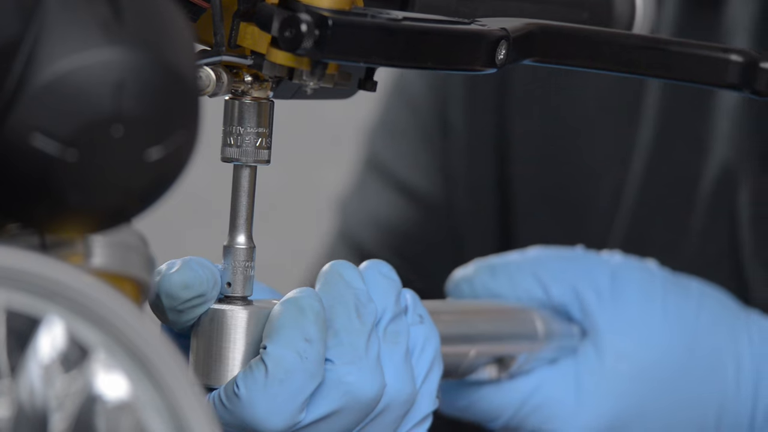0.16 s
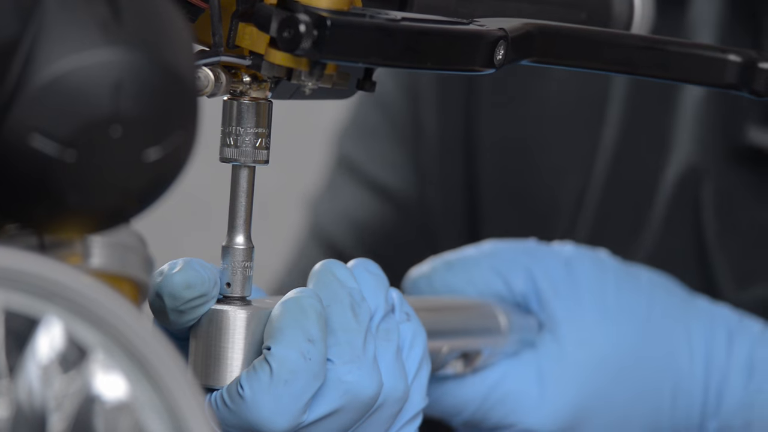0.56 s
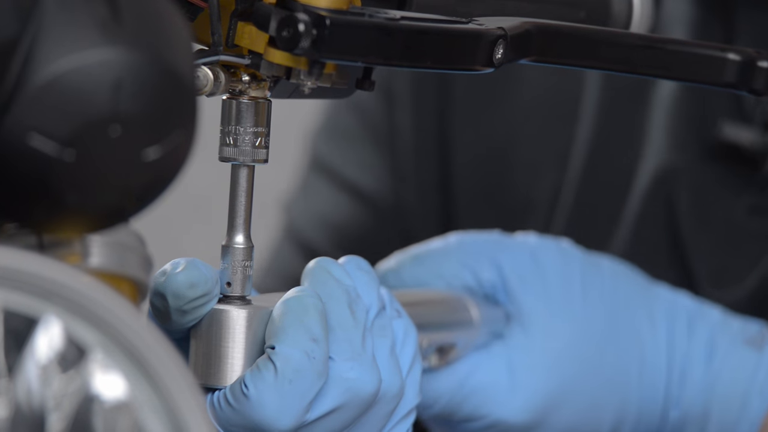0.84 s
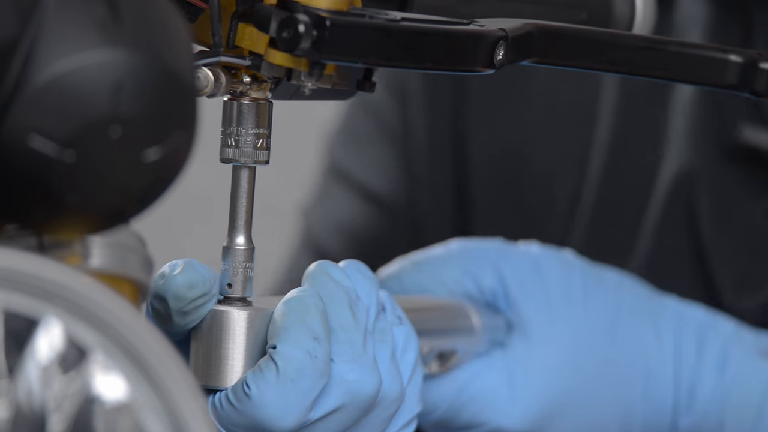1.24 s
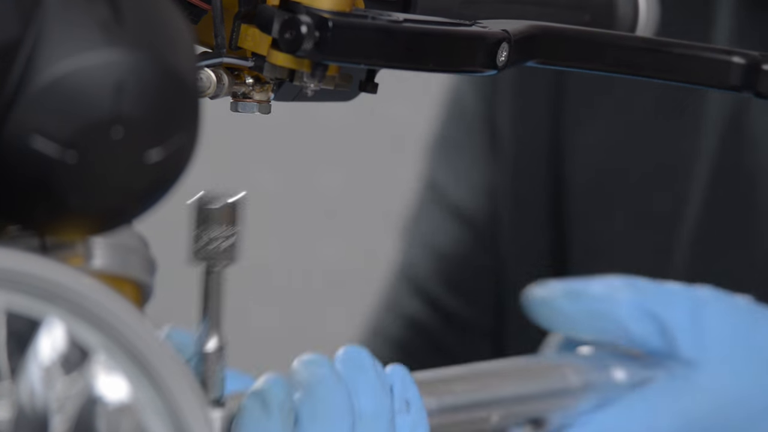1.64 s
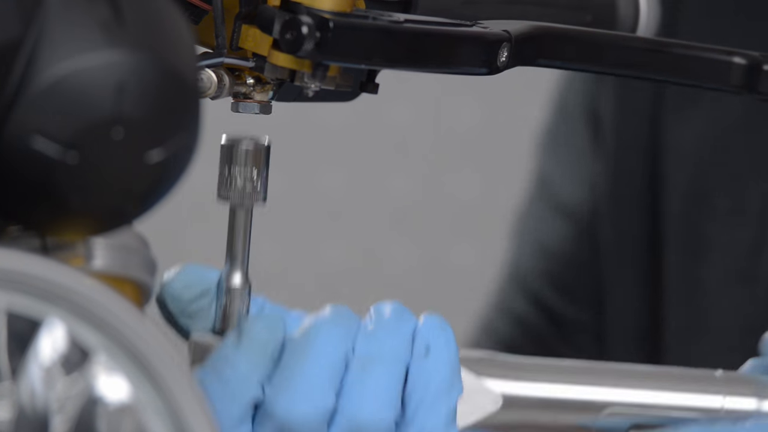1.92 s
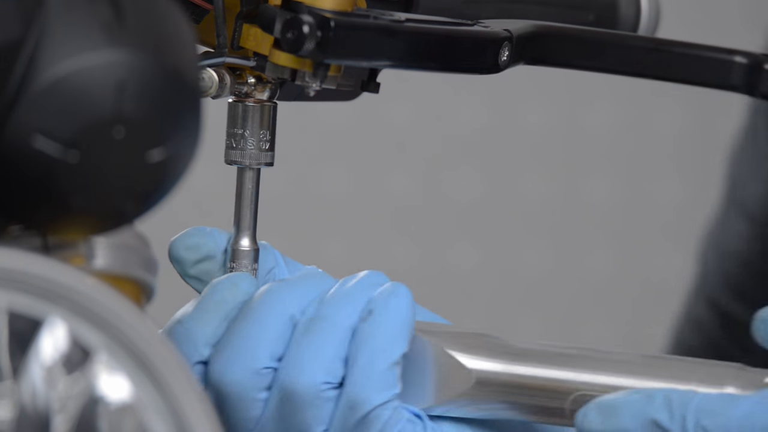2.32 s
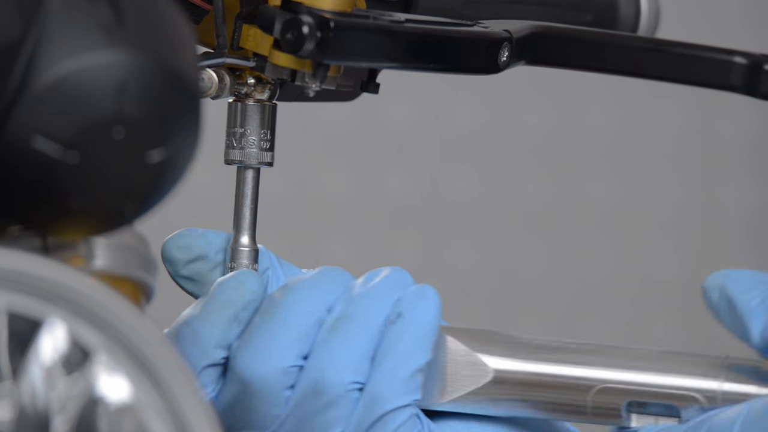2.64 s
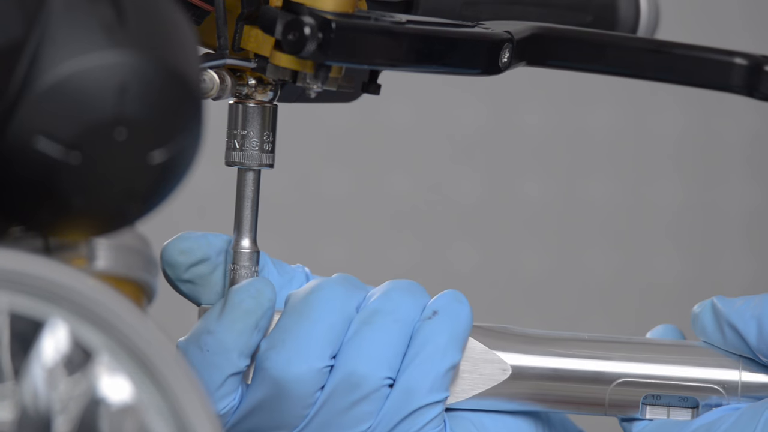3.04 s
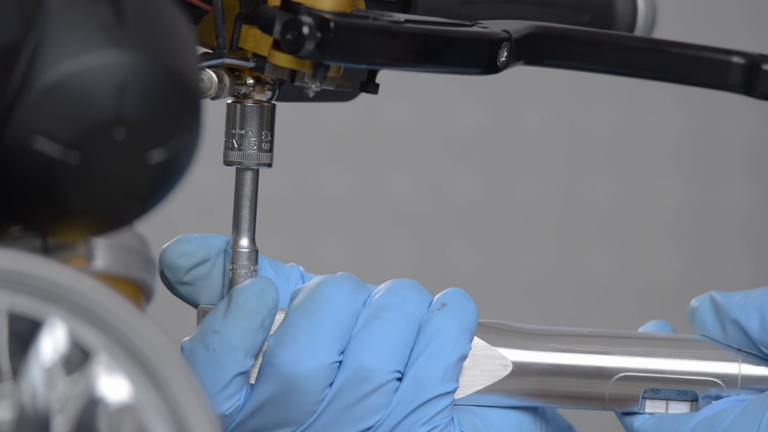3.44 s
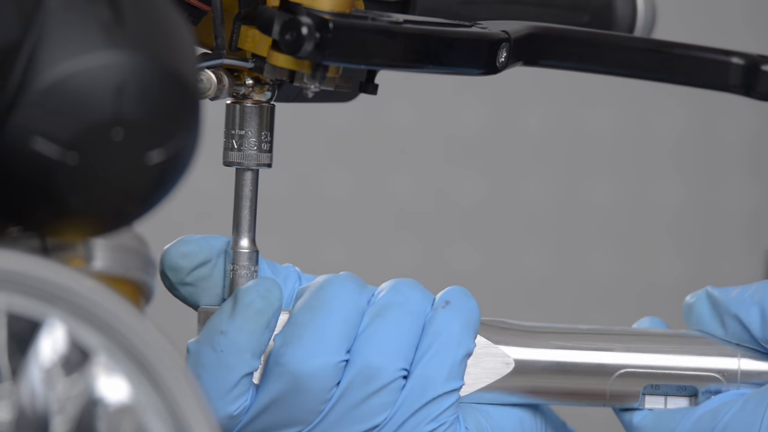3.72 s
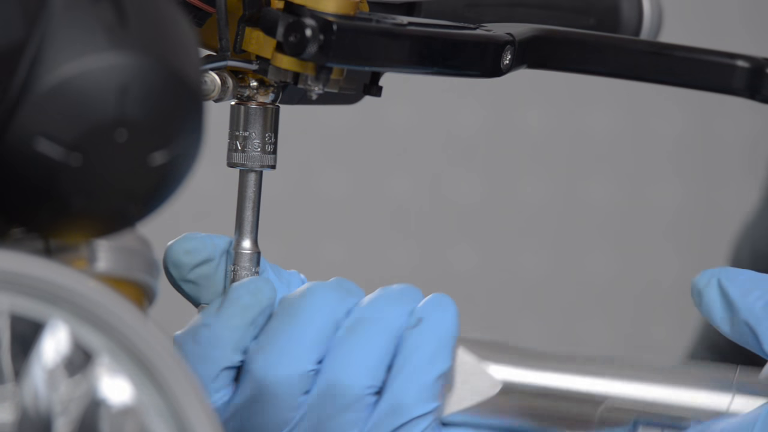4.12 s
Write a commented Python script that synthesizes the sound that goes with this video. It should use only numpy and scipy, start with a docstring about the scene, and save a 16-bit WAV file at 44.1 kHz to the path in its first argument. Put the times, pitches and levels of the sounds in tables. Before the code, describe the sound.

A quiet workshop heard close up, with very faint, dull ventilation noise throughout. From 0 to 0.67 s a ratchet gives about fourteen tiny, uneven ticks, some doubled, over barely audible glove creep. At 0.73 s the wrench breaks over: a very loud, dry, bright steel crack, its ring dying within hundredths of a second, then quick echoes, a short room tail of under half a second and a faint singing of the frame. Rubber gloves hiss softly from 1.2 to 1.95 s. A bright knock at 1.56 s starts loose-socket chatter and gritty scraping, with a low hand bump near 1.74 s. At 2.06 s a firm double steel knock clunks the bracket, followed by small dull rattles to 2.45 s. Gloves rub at 2.5-2.8 s, with a brief scrape and weak taps until 2.96 s. After near silence, a second equally loud click snaps at 3.69 s. A light bright knock, soft bump and short glove slide end it around 4.2 s.

```python
"""A click-type torque wrench tightens two bolts under a motorcycle's handlebar in a quiet workshop.
Its ratchet ticks faintly, then it breaks over with a sharp steel click: decaying modes plus noise bursts.
Gloves hiss on the handle, the loose socket chatters and scrapes on its extension (random stick-slip) and
knocks its way to the next bolt (bursts and a ringing bracket); the wrench breaks over again.
Echoes, room tail and air noise surround it."""
import sys
import numpy as np
from scipy import signal
from scipy.io import wavfile

SR = 44100
rng = np.random.default_rng(int(sys.argv[2]) if len(sys.argv) > 2 else 0)


def generate_wav(signal):
    """Clip the signal to [-1, 1] and save it as 16-bit WAV at the path in sys.argv[1]."""
    frames = np.transpose(np.atleast_2d(signal))
    scaled = np.clip(frames, -1, 1) * 32767
    pcm = np.round(scaled).astype(np.int16)
    wavfile.write(sys.argv[1], SR, pcm)


N = 188042
HZ = np.fft.rfftfreq(8192, 1 / SR)

# break-overs: (time [s], level [dB], grip [0 = hand round the head, 1 = hand round the shank])
BREAK_OVERS = [(0.7257, 0.000077, 0), (3.6862, 0.0031, 1)]


def amp(db):
    """Decibels to gain."""
    return 10 ** (np.asarray(db) / 20)


def evened(x):
    """Scales to rms 1."""
    return x / np.sqrt(np.mean(x ** 2) + 1e-20)


def decay(t, t60):
    """Exponential decay by 60 dB in t60 seconds."""
    return np.exp(-np.log(1000) * t / t60)


def read(points, hz):
    """Interpolates a spectrum along a log-frequency axis."""
    f, value = np.transpose(points)
    return np.interp(np.log(hz + 1), np.log(f + 1), value)


def add(mix, s, sound):
    """Lays a sound into the mix at time s."""
    part = mix[max(round(s * SR), 0):][:len(sound)]
    part += sound[:len(part)]


def colour(x, db):
    """Minimum-phase filter with the gain db at the frequencies HZ."""
    log_gain = np.log(amp(np.r_[db, db[-2:0:-1]]))
    taps = np.fft.ifft(np.exp(np.conj(signal.hilbert(log_gain)))).real
    return signal.oaconvolve(x, taps[:len(HZ)])[:len(x)]


def coloured_impulse(db):
    """Impulse response of the gain db at HZ."""
    return colour(signal.unit_impulse(len(HZ)), db)


def ring(modes, rise_s, length_s):
    """Dying sines, neighbours in opposite sign, swelling as the blow spreads through the metal."""
    t = np.arange(int(length_s * SR)) / SR
    sines = np.zeros(len(t))
    for k, (hz, t60, db) in enumerate(modes):
        sines += (-1) ** k * amp(db - 60 * t / t60) * np.sin(2 * np.pi * hz * t)
    return sines * (1 - np.exp(-(t / rise_s) ** 2))


def burst(db, rise_s, t60):
    """A contact excites countless brief overtones: coloured, decaying noise."""
    t = np.arange(len(HZ)) / SR
    grains = rng.choice([-1., 1.], len(t)) * (1 - np.exp(-t / rise_s)) * decay(t, t60)
    sound = colour(grains, db)
    return sound / np.sort(abs(sound))[-3:].mean()  # mean of the three highest peaks = 1


def strokes(rows, rise_share=0.23, swell_db=3, stop_s=.02, waver_db=2.94, waver_s=0.041):
    """Rubbing strength: each stroke rises, swells as it gains speed and dies away; pressure wavers."""
    t, strength = np.arange(N) / SR, np.zeros(N)
    for start, length, db in rows:
        age = np.maximum(t - start, 0)
        done = np.minimum(age / length, 1)
        rise = np.sqrt(np.minimum(done / rise_share, 1))
        stop = np.exp(-np.maximum(age - length, 0) / stop_s)
        strength += amp(db + swell_db * (done - .5)) * rise * stop
    pressure = np.interp(t / waver_s, np.arange(N), rng.standard_normal(N))
    return strength * amp(waver_db * pressure)


def slips(strength, per_s, spread_db):
    """Tiny, uneven stick-slip releases at random times that follow the strength of the rubbing."""
    sizes = amp(spread_db * np.minimum(rng.exponential(1, N), 4)) * rng.standard_normal(N)
    return strength * evened(sizes * (rng.random(N) < per_s / SR))


def air(rms_db=-66.5):
    """Steady, dull ventilation noise."""
    # noise spectrum: (frequency [Hz], relative density [dB])
    air_colour = [(12, -26.5), (20, -3), (96, -16), (204, -16), (228, -12.5), (262, -8.5), (310, -10),
                  (422, -4.5), (574, -14.5), (849, -11), (1150, -18.5), (1480, -15), (2080, -19),
                  (2530, -29.5), (11500, -46.5), (16000, -57)]
    return amp(rms_db) * evened(colour(rng.standard_normal(N), read(air_colour, HZ)))


def workshop(x, near_db=-11, near_t60=0.069, near_delay_s=.002, tail_db=-14, tail_delay_s=0.0079):
    """Quick echoes off the motorcycle's parts, then the diffuse tail of the room."""
    # reverberation time: (frequency [Hz], t60 [s])
    room_t60 = [(100, .8), (400, .45), (1500, .4), (5300, .4), (7500, .31), (11000, .26), (16000, .23)]
    # reverberation colour: (frequency [Hz], level [dB])
    room_colour = [(80, 10), (250, 1.5), (600, -6.5), (1000, -1), (1600, 1.5), (3000, 1.5), (5300, 1.5),
                   (7000, -1.5), (14000, 0.5)]
    t = np.arange(SR) / SR
    near = rng.standard_normal(SR) * (rng.random(SR) < 5000 / SR)  # 5000 echoes/s
    near = near * (t > near_delay_s) * decay(t, near_t60)
    hz, age, z = signal.stft(rng.choice([-1., 1.], SR), SR, nperseg=256)
    z = z * decay(age, read(room_t60, hz)[:, None])
    tail = signal.istft(z, SR, nperseg=256)[1][:SR] * (t > tail_delay_s)
    response = amp(near_db) * near / np.linalg.norm(near) + amp(tail_db) * tail / np.linalg.norm(tail)
    return signal.fftconvolve(x, colour(response, read(room_colour, HZ)))[:N]


def surface_echoes(direct):
    """Nearby hard surfaces throw back delayed, weaker copies of the direct sound."""
    # reflections: (delay [s], level [dB])
    reflections = [(.003, -25), (.0055, -27.5), (0.0127, -23), (0.0146, -24), (.019, -26)]
    out = np.zeros(N)
    for delay, db in reflections:
        add(out, delay, amp(db) * direct)
    return out


def frame(sing_db=-62, sing_t60=1.8):
    """Frame and handlebar sing on faintly after a break-over: modes so close they form decaying noise."""
    # frame spectrum: (frequency [Hz], level [dB])
    frame_colour = [(40, 7), (100, 9), (300, -8), (900, -3), (2500, -3.5), (5600, -1.5), (6600, -10),
                    (14000, -17)]
    out, t = np.zeros(N), np.arange(SR) / SR
    for s, db, grip in BREAK_OVERS:
        modes = evened(colour(rng.standard_normal(SR), read(frame_colour, HZ)))
        add(out, s, amp(db + sing_db) * decay(t, sing_t60) * modes)
    return out


def bumps():
    """A gloved hand meets the tool: a low puff without ring."""
    # bumps: (time [s], level [dB])
    bump_rows = [(1.743, -59.5), (2.954, -68), (4.176, -59.5)]
    # bump spectrum: (frequency [Hz], level [dB])
    bump_colour = [(30, -8.5), (60, -8), (100, 4.5), (180, -18), (500, -39.5), (2000, -68)]
    out = np.zeros(N)
    for s, db in bump_rows:
        add(out, s, amp(db) * burst(read(bump_colour, HZ), rise_s=0.0041, t60=0.077))
    return out


def gloves(slide_db=5, rest_db=-83.5):
    """Rubber slides on the handle: slips so many that they merge into a hiss; resting gloves creep a little."""
    # slides: (start [s], length [s], level [dB])
    slide_rows = [(0, 0.692, -88), (.62, 0.1283, -76), (1.23, 0.7194, -71.5), (2.22, 0.1315, -81),
                  (2.5, 0.2878, -68.5), (2.85, .09, -78.5), (4.04, .03, -83.5), (4.13, .13, -67.5)]
    # rubber hiss spectrum: (frequency [Hz], level [dB])
    glove_colour = [(300, -8.5), (1050, -2.5), (1800, 5.5), (2700, -1), (3800, -0.5), (5800, -5),
                    (8500, -9), (12000, -14.5), (15500, -16)]
    strength = amp(rest_db) + strokes(slide_rows)
    return amp(slide_db) * colour(slips(strength, per_s=13000, spread_db=3.5), read(glove_colour, HZ))


def scrape():
    """The loose socket chatters and scrapes on its extension: separate gritty slips ring its steel."""
    # scrapes: (start [s], length [s], level [dB])
    scrape_rows = [(1.56, 0.08, -69.5), (1.68, 0.1846, -66), (2.68, 0.098, -72.5)]
    # socket modes: (frequency [Hz], t60 [s], level [dB])
    socket_modes = [(1697, 0.0086, -9.5), (3418, 0.004, 0.5), (4138, 0.00367, -2.5), (6100, 0.0038, -7.5),
                    (14900, 0.0044, -18)]
    body = ring(socket_modes, rise_s=.0001, length_s=.05)
    grit = slips(strokes(scrape_rows), per_s=450, spread_db=0.78)
    return signal.oaconvolve(grit, body / np.linalg.norm(body))[:N]


def socket(knock_db=-1, pivot_hz=3500, room_db=-2, clunk_db=3, clunk_per_dullness=1.475,
           clunk_lag_s=0.001237, clunk_room_db=-4):
    """Loose steel on steel: glancing knocks are bright, square ones dull and ring the bracket more.
    Returns the direct sound and what goes into the room."""
    # socket on its extension and the bolt heads: (time [s], level [dB], brightness [dB/octave])
    knock_rows = [(1.5597, -36, 5), (1.627, -53, 8), (1.669, -49.5, -1), (1.7341, -40, -1),
                  (1.7537, -42, -0.5), (1.8824, -52, 2.5), (1.9293, -46.5, 1), (2.0588, -26, -1.2),
                  (2.0617, -28.5, 2.5), (2.15, -43, 2), (2.261, -49, -1.5), (2.2888, -48, -4.5),
                  (2.3097, -43, -1.5), (2.3286, -48, -6), (2.3357, -46.5, -2.5), (2.4482, -48, -2),
                  (2.7987, -49.5, -4), (2.9633, -54, 0.0), (4.1698, -36, 2.5), (4.1871, -49, -7.5)]
    # knock spectrum: (frequency [Hz], level [dB])
    knock_colour = [(150, -11.5), (450, -7), (1100, 1), (1800, 4.5), (2800, -1.5), (3700, -0.5),
                    (5200, 1.5), (7500, -6.5), (11000, -13), (15500, -25.5)]
    # bracket that holds the bolts, modes: (frequency [Hz], t60 [s], level [dB])
    bracket_modes = [(340, .04, -27), (466.2, 0.093, -20.5), (677.4, 0.082, -27.5), (1003, 0.0211, -20.5),
                     (1489, 0.059, -26), (1858, .014, -5)]
    # span in which knocks reach the bracket: (start [s], end [s])
    seating = (2.0, 2.5)
    direct, spread = np.zeros(N), np.zeros(N)
    octaves = np.log2(np.maximum(HZ, 1000) / pivot_hz)
    bracket = ring(bracket_modes, rise_s=.0003, length_s=.5)
    for s, db, brightness in knock_rows:
        tone = read(knock_colour, HZ) + brightness * octaves
        knock = amp(db + knock_db) * burst(tone, rise_s=.0003, t60=.012)
        add(direct, s, knock)
        add(spread, s, amp(room_db) * np.std(knock) * evened(coloured_impulse(tone)))
        if seating[0] < s < seating[1]:
            clunk = amp(db + clunk_db - clunk_per_dullness * brightness) * bracket
            add(direct, s + clunk_lag_s, clunk)
            add(spread, s + clunk_lag_s, amp(clunk_room_db) * clunk)
    return direct, spread


def ratchet(tick_db=-2.4, settle_db=-1.5):
    """The small pawl drops over the teeth and often ticks again as it settles."""
    # ticks: (time [s], level [dB], delay of second tick [s], 0 = none)
    tick_rows = [(.0054, -47.5, 0.0097), (0.0267, -53, 0.0063), (0.0754, -49.5, 0.0029),
                 (.1096, -49.5, 0.0052), (.155, -52, 0.0016), (0.182, -50.5, 0), (.2355, -51, 0),
                 (0.3075, -51.5, 0.0135), (0.3543, -50.5, 0.0154), (0.4322, -48.5, .004),
                 (0.4776, -51.5, 0.00011), (0.5993, -50.5, 0), (0.624, -48.5, 0.00028),
                 (0.6725, -52, 0.0018)]
    # tick spectrum: (frequency [Hz], level [dB])
    tick_colour = [(500, -23.5), (1300, -2.5), (1900, 6.5), (2700, -7.5), (3800, -1), (6000, -5),
                   (8000, -12.5), (11000, -15), (13000, -26), (15500, -38)]
    out, tone = np.zeros(N), read(tick_colour, HZ)
    for s, db, settle_s in tick_rows:
        add(out, s, amp(db + tick_db) * burst(tone, rise_s=0.00038, t60=0.0084))
        if settle_s > 0:
            second = amp(db + settle_db + tick_db) * burst(tone, rise_s=0.00038, t60=0.0084)
            add(out, s + settle_s, second)
    return out


def break_overs(crack_db=-11, slip_db=-16, slip_lead_s=0.00065, room_db=17):
    """The pawl block slips off its seat, then the head slaps the tube and the whole tool rings.
    Returns the direct sound and what the tool sends into the room."""
    # wrench, socket and the frame they bear on, modes:
    # (frequency [Hz], t60 [s], level in grip 0 [dB], level in grip 1 [dB])
    wrench_modes = [(32, 0.12, -47, -39.5), (79.12, 0.11, -54, -41), (132.45, .25, -60, -61.5),
                    (201, 1.8, -66, -69.5), (307.2, 0.016, -28.5, -20.5), (456, 0.041, -23, -22),
                    (1080, 0.01, -15, -15), (1300, 0.016, -22.5, -22), (1541.3, 0.026, -24.5, -15),
                    (1780, .014, -16.5, -23), (1947, 0.025, -15.5, -16), (2504.4, 0.011, -23.5, -18),
                    (3174, 0.01, -17.5, -9.5), (3674.4, 0.008, -9, -5), (4445, 0.0073, -0.5, -6),
                    (5359.8, 0.01, -12, -5), (5730, 0.77, -65.5, -76), (6592, .011, -16.5, -8),
                    (7273, 2.5, -79, -103.5), (7828.5, 0.01, -5, -11.5), (9170, 0.008, -23, -28.5),
                    (10234, 0.012, -13, -15.5), (12155, 0.0083, -28, -27.5), (13433, 0.024, -24, -24)]
    # dense, short-lived steel overtones: (frequency [Hz], level [dB])
    crack_colour = [(200, -17.5), (900, -1.5), (2000, -1.5), (4500, -3), (7000, -4.5), (11000, -8.5),
                    (14000, -11.5), (16000, -22)]
    # shading of the room sound by the hands: (frequency [Hz], gain in grip 0 [dB], gain in grip 1 [dB])
    hand_shading = [(200, 3.5, 0), (700, -3, -0.5), (1148, 0.5, -1.5), (1551, 0, 3), (2274, -3.5, -3.5),
                    (2913, 2.5, 2), (3900, -4.5, -2), (5350, 3, 4), (6600, -0.5, 0)]
    direct, spread, steel = np.zeros(N), np.zeros(N), read(crack_colour, HZ)
    for s, db, grip in BREAK_OVERS:
        modes = [(hz, t60, levels[round(grip)]) for hz, t60, *levels in wrench_modes]
        add(direct, s - slip_lead_s, amp(db + slip_db) * burst(steel, rise_s=.0008, t60=.005))
        add(direct, s, amp(db) * ring(modes, rise_s=0.00025, length_s=0.99))
        add(direct, s, amp(db + crack_db) * burst(steel, rise_s=.0005, t60=.013))
        # over all directions the ring's peaks and dips mostly even out: send a smooth spectrum
        shade = read([(hz, gains[round(grip)]) for hz, *gains in hand_shading], HZ)
        add(spread, s, amp(db + room_db) * coloured_impulse(steel + shade))
    return direct, spread


def scene(rub_room_db=-2, ring_room_db=-14):
    """Tool and hands in the room, over the air."""
    clicks, clicks_spread = break_overs()
    knocks, knocks_spread = socket()
    rubs = ratchet() + scrape() + gloves()
    direct = clicks + knocks + rubs
    room_send = clicks_spread + knocks_spread + amp(ring_room_db) * clicks + amp(rub_room_db) * rubs
    mix = air() + workshop(room_send) + surface_echoes(direct) + frame() + bumps() + direct
    return mix[None]


def record(dry, edge_hz=16100):
    """Clips at full scale, then limits the band with a linear-phase low-pass."""
    clipped = np.clip(dry, -1, 1)
    low_pass = signal.firwin(255, edge_hz, window=("kaiser", 9), fs=SR)
    return signal.oaconvolve(clipped, low_pass[None], "same")


dry = scene()
out = record(dry)
generate_wav(out)
```